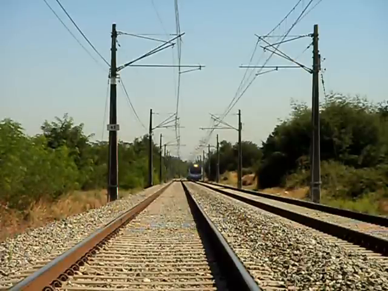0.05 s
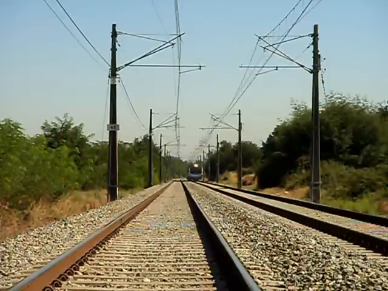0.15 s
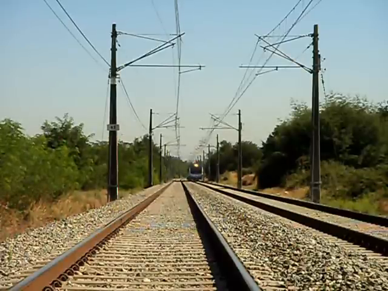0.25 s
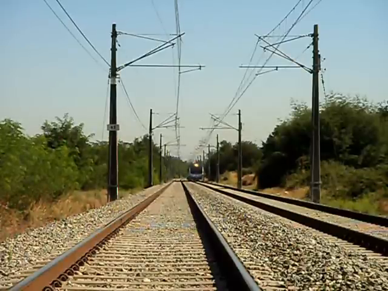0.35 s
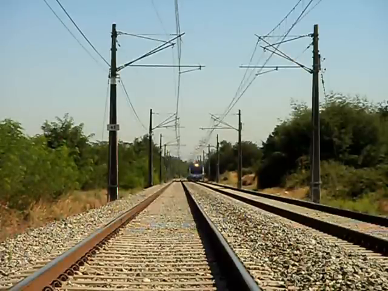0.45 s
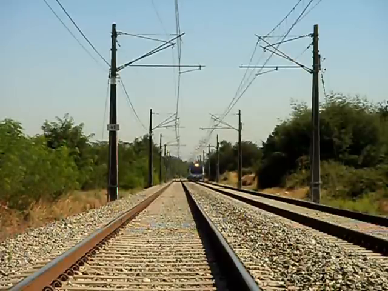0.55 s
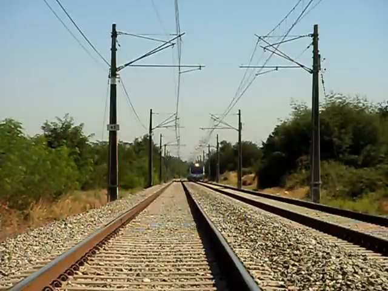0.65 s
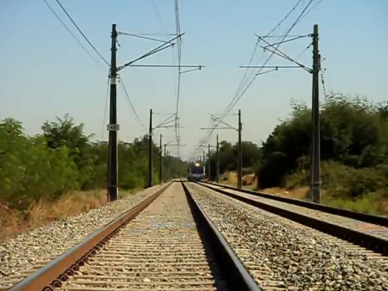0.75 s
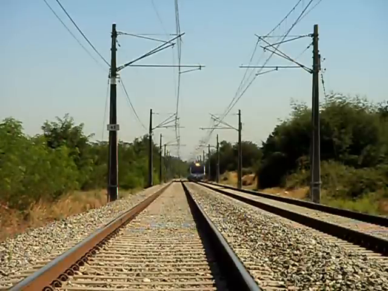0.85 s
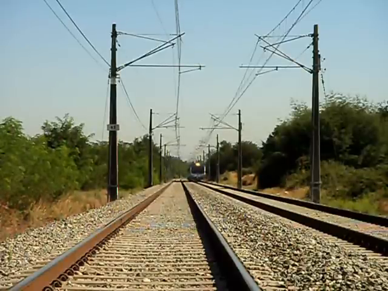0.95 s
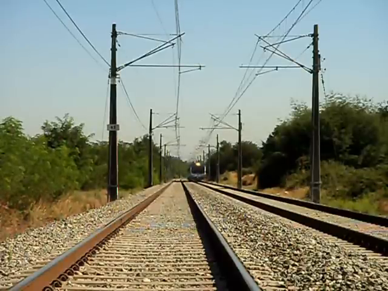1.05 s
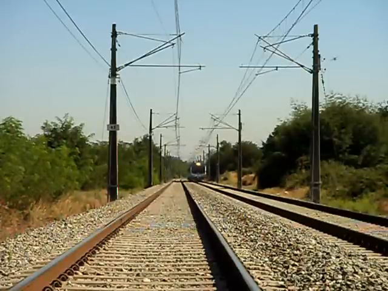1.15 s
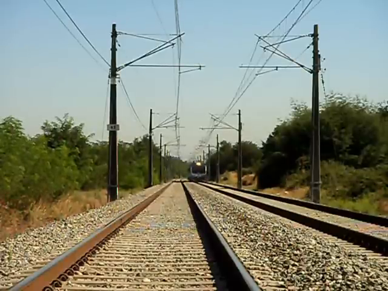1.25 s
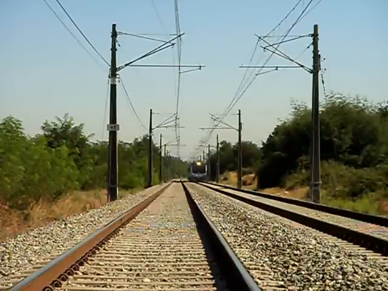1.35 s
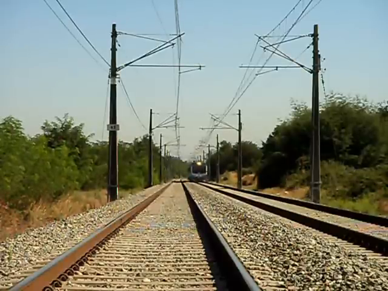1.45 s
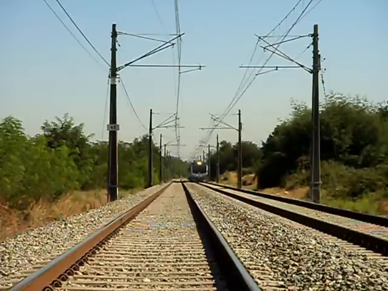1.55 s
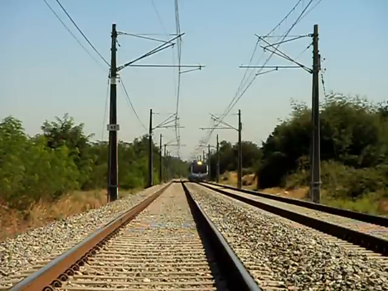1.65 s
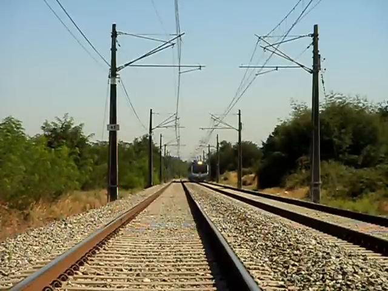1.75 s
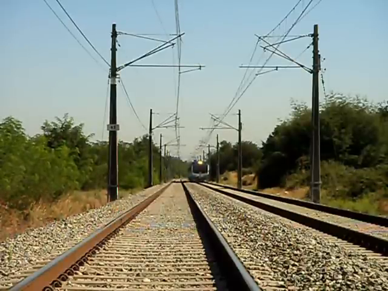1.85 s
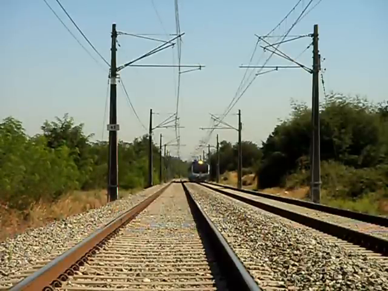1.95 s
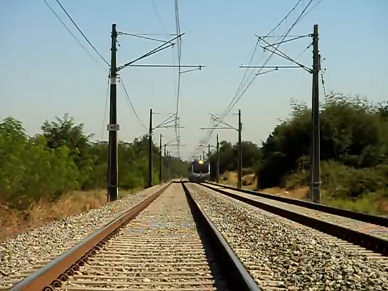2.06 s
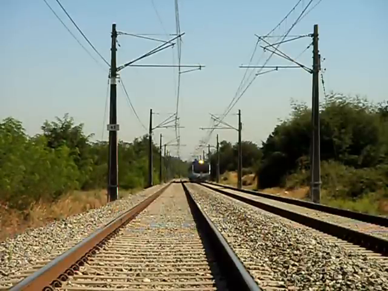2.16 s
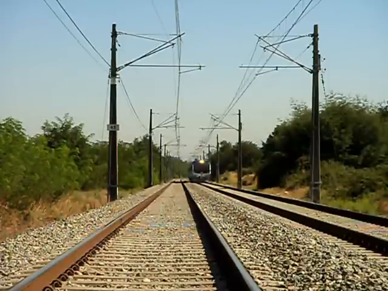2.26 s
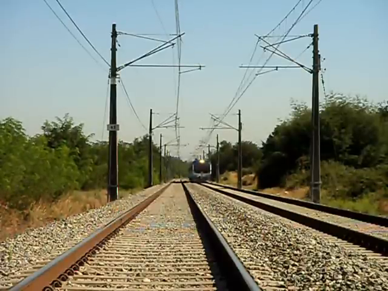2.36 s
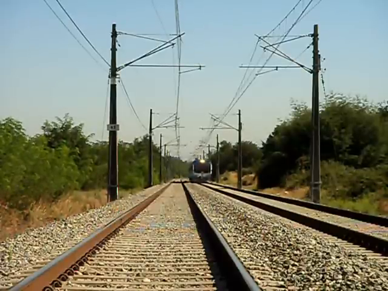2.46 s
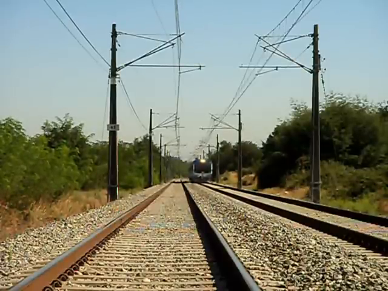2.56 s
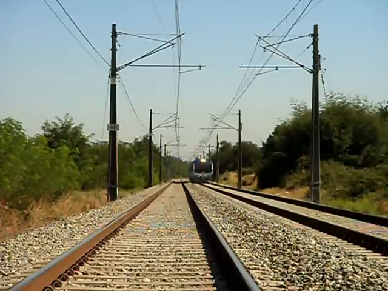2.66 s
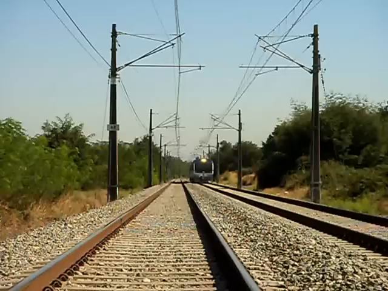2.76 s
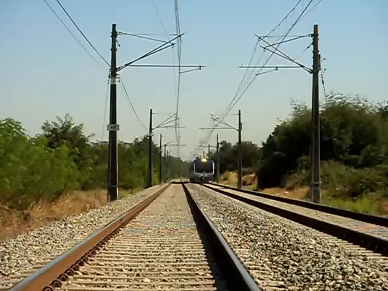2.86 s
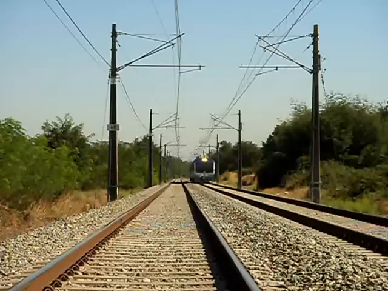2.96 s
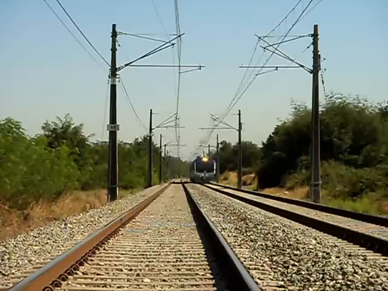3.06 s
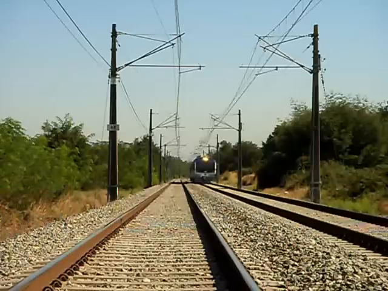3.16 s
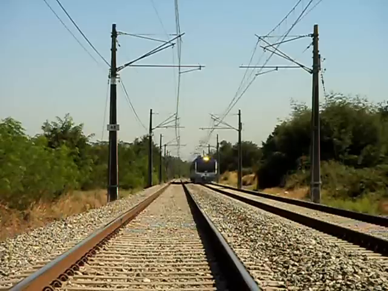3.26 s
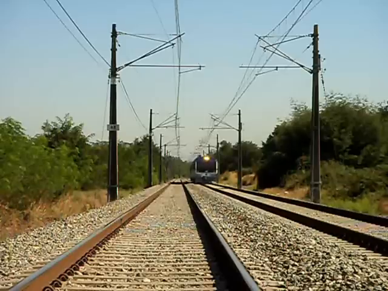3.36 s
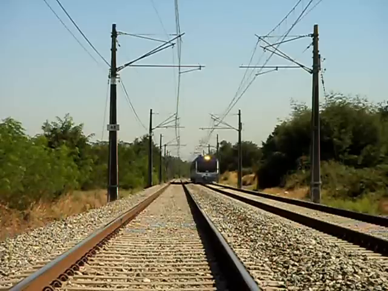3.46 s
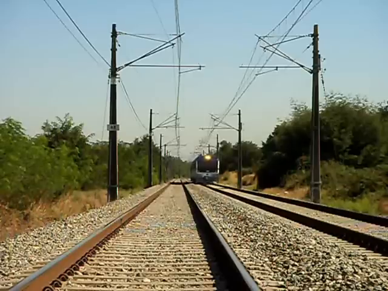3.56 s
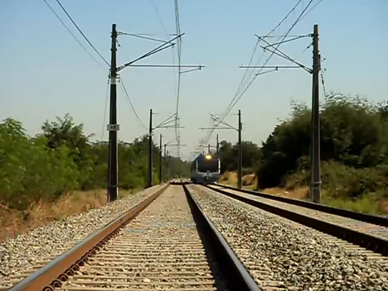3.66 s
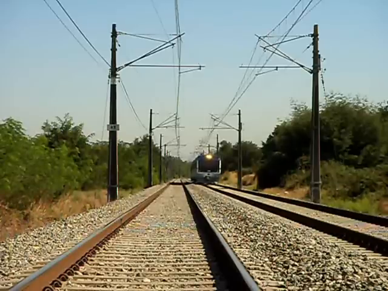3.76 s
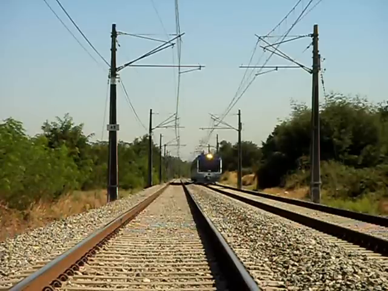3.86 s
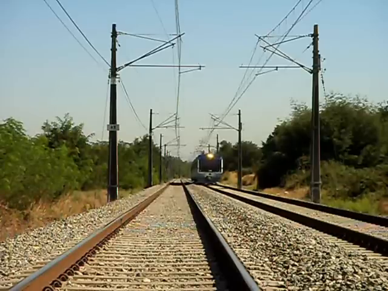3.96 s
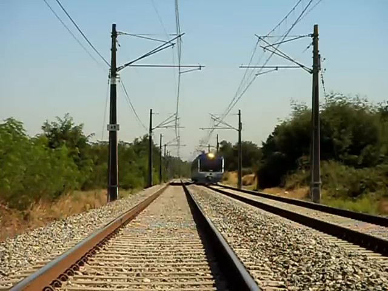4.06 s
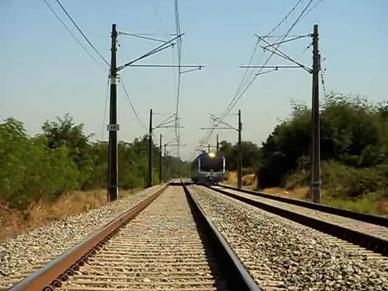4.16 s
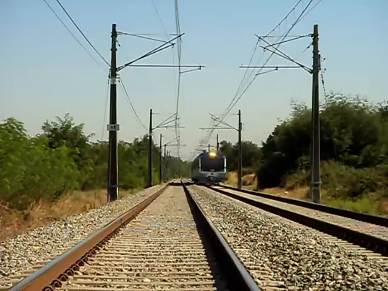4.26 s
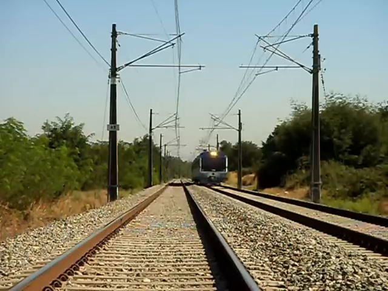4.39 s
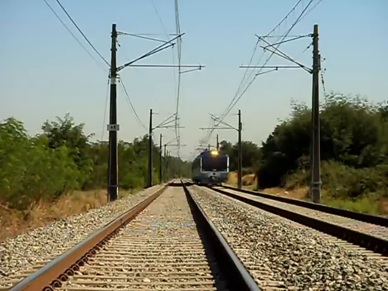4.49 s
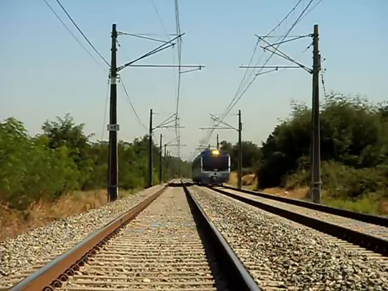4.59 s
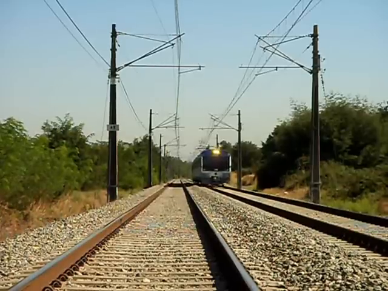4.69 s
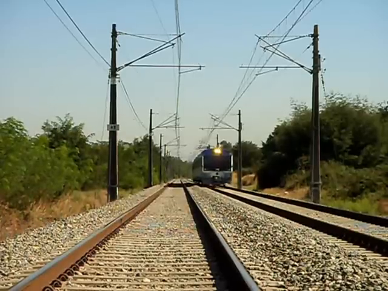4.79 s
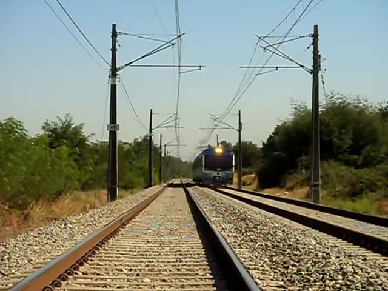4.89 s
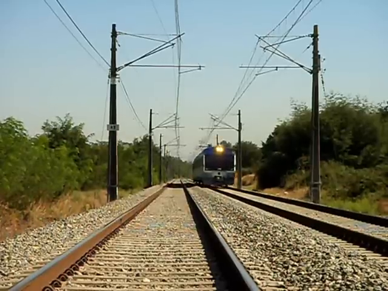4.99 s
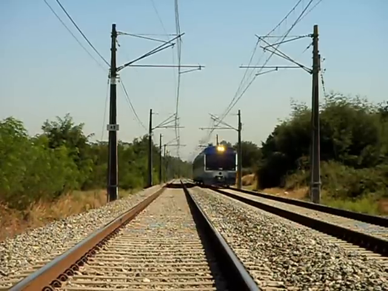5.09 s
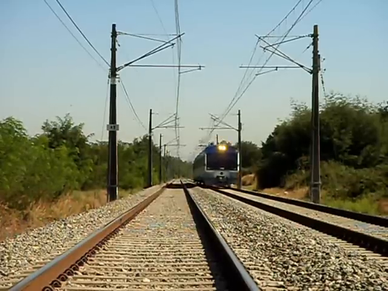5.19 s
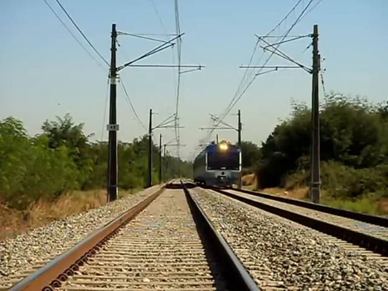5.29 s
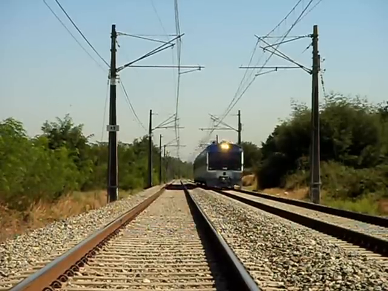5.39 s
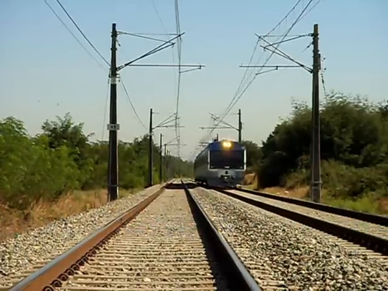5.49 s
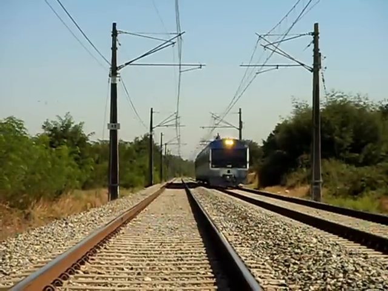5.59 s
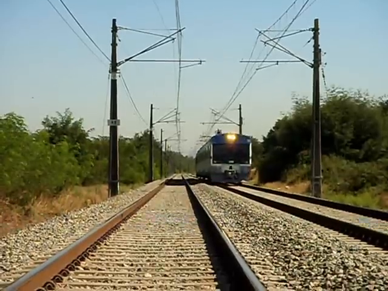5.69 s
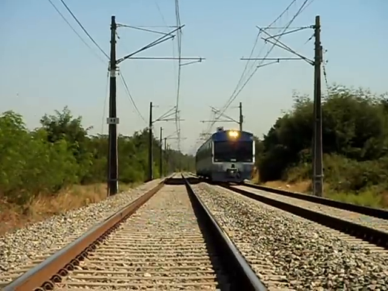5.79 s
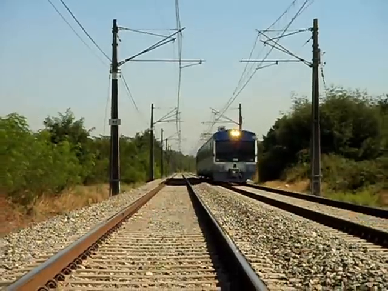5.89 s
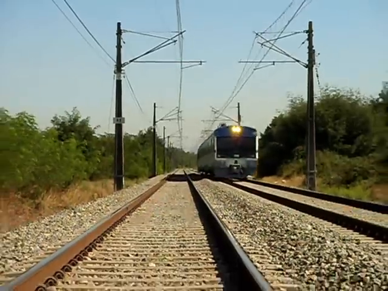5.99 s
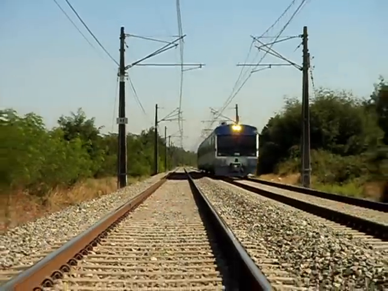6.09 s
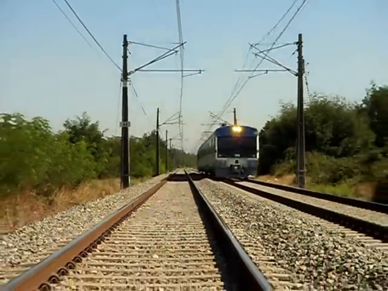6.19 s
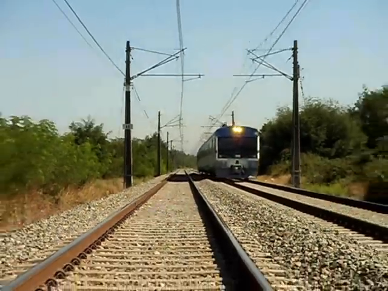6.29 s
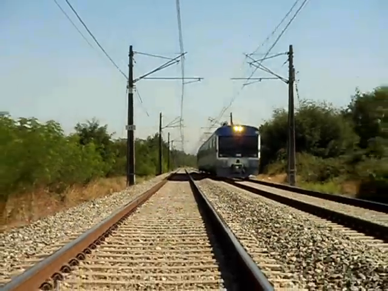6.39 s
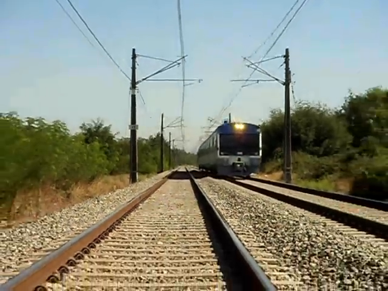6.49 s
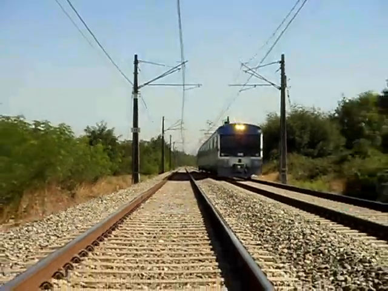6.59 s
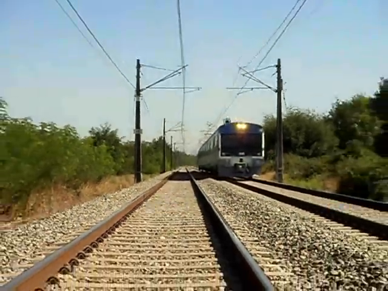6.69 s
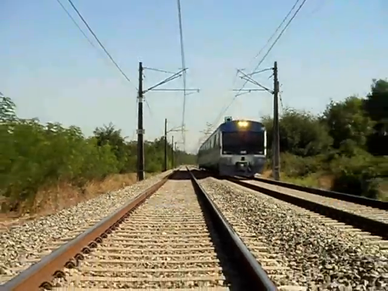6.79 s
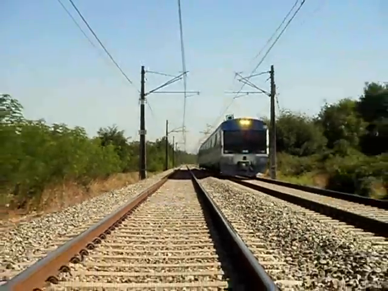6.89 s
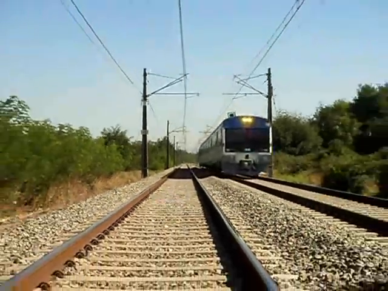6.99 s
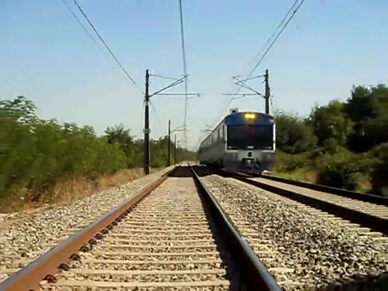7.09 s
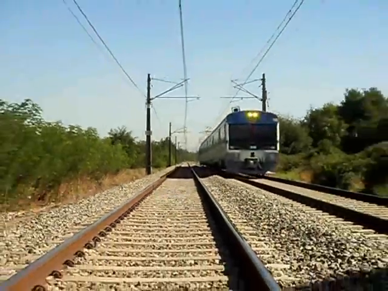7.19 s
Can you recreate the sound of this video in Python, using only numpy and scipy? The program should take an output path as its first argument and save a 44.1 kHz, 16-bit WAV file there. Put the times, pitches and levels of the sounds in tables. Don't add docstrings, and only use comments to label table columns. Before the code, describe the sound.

Rails sing with a wavering metallic ring and sharp falling pings, swelling steadily as an electric train bears down on a trackside microphone.

```python
import sys
import numpy as np
from scipy import signal
from scipy.fft import rfft, irfft, next_fast_len
from scipy.io import wavfile
from scipy.ndimage import map_coordinates

SR = 44100
rng = np.random.default_rng(int(sys.argv[2]) if len(sys.argv) > 2 else 0)


def magnitude_from_level(level_db):
    exponent = np.asarray(level_db, float) / 20
    return 10 ** exponent


def unload_wav(signal):
    wavfile.write(
        sys.argv[1],
        SR,
        np.round(np.clip(np.atleast_2d(signal).T, -1, 1) * 32767).astype(np.int16),
    )


N = 319284

# frequency in Hz, level when near in dB,
# extra loss over the first distance in dB.
SONG = [(490, -27.5, 62), (816, -7, 80), (909.4, 1.5, 37), (1000, 5, 30.5), (1100, 3.5, 23),
        (1200, 3, 10.5), (1301.4, -0.5, 2), (1400, 0.5, -3.5), (1467.7, -1.5, 4.5), (1512, -28.5, 33.5),
        (1808, -26, 4.5), (1990, -19, 10), (2068, -27, 7), (2400, -47.5, 5)]
# level when near in dB, loss over the first distance in dB, share of the swells.
RAIL_SONG, RAIL_HISS = (-38, 18.03, 0.91), (-53, 33.9, 0.15)
GROUND, RIM_RING = (-54.5, 18.7, 0.38), (-57, 23, .3)


def unit(x):
    return x / np.sqrt(np.mean(x ** 2) + 1e-20)


def along(hz, points, db):
    return np.interp(np.log(hz + 1), np.log(points + 1), db)


def wobble(rate_hz):
    knots = rng.standard_normal(int(N * rate_hz / SR) + 4)
    return map_coordinates(knots, [np.arange(N) * rate_hz / SR])


def coloured(points):
    size = next_fast_len(N)
    gain = magnitude_from_level(along(np.fft.rfftfreq(size, 1 / SR), *np.transpose(points)))
    return irfft(rfft(rng.standard_normal(size)) * gain, size)[:N] * np.sqrt(SR / 2)


def add(track, s, sound):
    part = track[max(round(s * SR), 0):][:len(sound)]
    part += sound[:len(part)]


def causal(gain):
    cepstrum = irfft(np.log(gain + 1e-4))
    half = len(cepstrum) // 2
    cepstrum[1:half] *= 2
    cepstrum[half + 1:] = 0
    return np.exp(rfft(cepstrum))


def far(s):
    arrives_s, run_s = 7.243, 6.5
    return np.clip((arrives_s - s) / run_s, 0, None)


def level(law, s):
    # time in seconds, swell in dB.
    swell = [(0, 0), (.54, 2.5), (.85, -0.5), (1.6, .5), (2.1, .3), (3, 0.8), (3.8, 0.5), (4.3, -.6),
             (5, -1.3), (5.3, 2), (5.7, -0.1), (6.3, 1.9), (6.55, 1.2), (6.81, -3), (7.1, 1.5),
             (7.24, -0.3)]
    near_db, loss_db, share = law
    return near_db - loss_db * far(s) + share * np.interp(s, *np.transpose(swell))


def path(table, hz, s):
    points, near_db, loss_db = np.transpose(table)
    near = along(hz, points, near_db)[:, None]
    loss = along(hz, points, loss_db)[:, None]
    return magnitude_from_level(near - loss * far(s))


def carried(table, width_hz, x):
    hz, s, z = signal.stft(x, SR, nperseg=2048)
    passed = signal.istft(z * path(table, hz, s), SR, nperseg=2048)[1][:N]
    return passed * np.sqrt(SR / 2 / width_hz)


def rolling(s):
    # frequency in Hz, level when near in dB, extra first-distance loss
    # in dB.
    high_bands = [(6000, -15.5, 16), (6920, -11.5, 23), (7330, -0.5, 14), (8050, 0.5, -3.5), (8220, -2, -8),
                  (8660, -9, 9), (9200, -6.5, 6), (9800, -9.5, 10),
                  (10350, -12, 6), (10650, -8, -7), (11500, -7, -5), (11800, -11, 14), (12100, -13, 16),
           (12700, -10, 16), (13600, -10, 14), (13880, -4, -6), (14300, -3, 5), (14600, -6, 16),
           (15000, -14, 18), (15700, -14, 14)]
    # frequency in Hz, level when near in dB, extra first-distance loss in dB.
    air_path = [(150, -2.5, 5), (230, -5, 11), (335, 7, 7), (455, 13, 16.5), (574, 6, 35), (740, 14, 39),
                (1530, 10.5, 3), (2180, 6.5, 2), (3000, 4.5, 1.5), (3160, 0.5, 2), (6500, -5.5, 8),
                (16000, -16, 2)]
    lumps = 0.77 * wobble(13) + 0.6 * wobble(37)

    def rough(share, own_db):
        swing_db = share * lumps + own_db * wobble(75)
        return unit(magnitude_from_level(swing_db) * rng.standard_normal(N))

    song = magnitude_from_level(level(RAIL_SONG, s) + 1.5) * carried(SONG, 215, rough(0.84, own_db=1.5))
    crackle = magnitude_from_level(1.17 * wobble(260)) * rough(0.28, own_db=0.8)
    hiss = magnitude_from_level(level(RAIL_HISS, s)) * carried(high_bands, 760, crackle)
    first_db, aside = -66.5, 0.095
    roar_db = first_db - 20 * np.log10(far(s) + aside)
    roar = magnitude_from_level(roar_db - 1.0) * carried(air_path, 4570, rough(0.53, own_db=0.9))
    return song + hiss + roar


def rim_ring(s):
    # frequency in Hz, level in dB.
    rim = [(1820, -44), (1850, -16), (1862, -11), (1878, -7.5), (1920, -36)]
    # time in seconds, extra level in dB.
    spells = [
        (0, -3),
        (1.5, -4),
        (1.65, 1),
        (3.05, 4),
        (3.35, -5),
        (3.55, 1),
        (4.6, 1.5),
        (5.1, -1),
        (7.24, 0),
    ]
    ring = unit(coloured([(1600, -90)] + rim + [(2200, -90)]))
    extra_db = np.interp(s, *np.transpose(spells)) + 1.5 * wobble(7)
    return magnitude_from_level(level(RIM_RING, s) + extra_db) * ring


def ground_rumble(s):
    # frequency in Hz, level in dB.
    rumble = [(15, -28), (35, -7.5), (55, -1.5), (78, 2), (105, -1.5), (135, -13.5), (170, -33), (300, -46)]
    return magnitude_from_level(level(GROUND, s) + 2.0 + 0.93 * wobble(4.04)) * unit(coloured(rumble))


def still_air():
    # frequency in Hz, level in dB per Hz.
    air = [(20, -100), (200, -99.5), (400, -96), (1000, -93.5), (2000, -100), (5000, -104), (10000, -112),
           (16000, -113)]
    return coloured(air)


def contacts():
    # time in seconds, peak in dB, strongest frequency in Hz.
    welds = [
        (0.4, -26, 1370),
        (.7213, -35, 1430),
        (1.294, -36, 1400),
        (1.7253, -28.5, 1427),
        (2.5325, -20, 1370),
        (3.614, -25.5, 1350),
        (4.784, -22.5, 1480),
        (5.484, -13, 1427),
    ]
    # time in seconds, peak in dB, strongest frequency in Hz.
    flaws = [(.83, -42, 1360), (1.4302, -38, 1390), (2.154, -29.5, 1440), (2.4688, -28, 1344),
             (3.23, -30, 1330), (3.255, -29.5, 1380), (3.3648, -30.5, 1356), (3.823, -28.5, 1380),
             (4.002, -29, 1280), (4.047, -30, 1430), (4.434, -23.5, 1330), (4.946, -27, 1370),
             (5.058, -30, 1390), (5.389, -23, 1200), (5.572, -23, 1420), (5.595, -23, 1330),
             (5.695, -21, 1200), (5.806, -20, 1250), (5.837, -20.5, 1440), (6.022, -18.5, 1100),
             (6.16, -18.5, 1180), (6.324, -15.5, 1410), (6.448, -17.5, 1430), (6.501, -14, 1280),
             (6.568, -15.5, 1160), (6.657, -21, 1180), (6.874, -10.5, 1410), (6.893, -8.5, 1210),
             (7.031, -15, 1270), (7.197, -16, 1190)]
    forerun_s, forerun_db = .0163, -11.5
    forerunners = [(t - forerun_s, db - forerun_db * -1, hz) for t, db, hz in welds]
    pits, over_song_db, scatter_db = 85, 13.5, 1.5
    top_hz, range_hz = 1430, 419
    when, size, pitch = rng.random((pits, 3)).T
    s = (np.arange(pits) + when) / pits * N / SR
    pit_db = level(RAIL_SONG, s) + over_song_db + scatter_db * (2 * size - 1)
    pit_hz = top_hz - range_hz * pitch * np.clip(1.15 - far(s), .1, 1)
    return welds + forerunners + flaws + list(zip(s, pit_db, pit_hz))


def blows():
    out, size, lead = np.zeros(N), 8192, 1024
    hz = np.fft.rfftfreq(size, 1 / SR)
    below = np.clip(1480 - hz, 0, 800) / 400
    hits = contacts()
    for (s, db, top_hz), lags in zip(hits, rng.random((len(hits), 3))):
        delay_s = below ** 1.6 * (.0015 + .006 * far(s))
        spread = np.cumsum(delay_s) * 2 * np.pi * hz[1]
        echoes = 1
        for k, u in enumerate(lags):
            lag_s = .0055 * (k + 1.1 + .4 * u)
            echoes = echoes + magnitude_from_level(-11.0 - 2.9 * k) * np.exp(-2j * np.pi * hz * lag_s)
        width_hz = 300 - 170 * far(s)
        lean = 1 / (1 + ((hz - top_hz) / width_hz) ** 2)
        response = causal(path(SONG, hz, s)[:, 0] * lean)
        ping = irfft(response * echoes * np.exp(-1j * spread))
        ping = np.roll(ping, lead - np.abs(ping).argmax())
        add(out, s + 0.002156 - lead / SR, magnitude_from_level(db - 2.5) * ping / np.abs(ping).max())
    return out


def rattles():
    # start in seconds, level in dB.
    events = [(.4, -58), (1.726, -64), (2.531, -50), (3.617, -64), (4.435, -66), (4.785, -55), (5.436, -56),
              (5.482, -44.5), (5.535, -57), (6.893, -40), (7.196, -37.5)]
    out, size = np.zeros(N), 360
    band = signal.butter(2, [2600, 13000], "band", fs=SR)
    for s, db in events:
        rattle = signal.lfilter(*band, rng.standard_normal(size))
        add(out, s, magnitude_from_level(db) * rattle * np.hanning(size))
    return out


def shell_ticks():
    # start in seconds, peak in dB, lowest and highest frequency in Hz, t60 in seconds.
    ticks = [
        (2.807, -38.5, 400, 900, .004),
        (3.38, -51, 300, 600, .006),
        (5.7022, -14, 50, 20000, .014),
        (5.795, -43, 2200, 4500, .01),
        (5.822, -29.5, 1700, 6500, .012),
        (5.955, -42, 2000, 3800, .01),
    ]
    # frequency in Hz, level in dB.
    shell = [(60, -14), (600, -14), (1000, -5), (1600, 3), (2300, 1), (3500, 0), (5500, 0), (6300, -6),
             (7000, -13), (9000, -4), (10500, -11), (13000, -6), (14500, -18), (17000, -18)]
    # lag in seconds, size as a ratio.
    rebounds = [
        (0, 1),
        (.00112, .45),
    ]
    out, size = np.zeros(N), 2048
    t, hz = np.arange(size) / SR, np.fft.rfftfreq(size, 1 / SR)
    shell_gain = magnitude_from_level(along(hz, *np.transpose(shell)))
    for s, db, low_hz, high_hz, t60_s in ticks:
        jolt = .07 * rng.standard_normal(size) * magnitude_from_level(-60 * t / t60_s)
        for lag_s, part in rebounds:
            jolt[round(lag_s * SR)] += part
        band = 1 / (1 + (low_hz / (hz + 1)) ** 4) / (1 + (hz / high_hz) ** 4)
        tick = irfft(rfft(jolt) * causal(shell_gain * band))
        add(out, s, magnitude_from_level(db) * tick / np.abs(tick).max())
    return out


def bird():
    # start in seconds, length in seconds, first and last frequency in Hz, peak in dB.
    whistles = [
        (4.25, .04, 4050, 3950, -68),
        (4.36, .06, 2040, 1940, -59),
        (4.84, .055, 2830, 2500, -61),
        (5.35, .105, 2430, 2800, -57),
        (5.455, .055, 2800, 3280, -56),
        (5.59, .06, 2640, 2690, -58),
    ]
    out, quiver_hz = np.zeros(N), 22 * wobble(90)
    for s, length_s, first_hz, last_hz, db in whistles:
        u = np.linspace(0, 1, round(length_s * SR))
        hz = first_hz + (last_hz - first_hz) * u + quiver_hz[round(s * SR):][:len(u)]
        tone = np.sin(2 * np.pi * np.cumsum(hz) / SR)
        add(out, s, magnitude_from_level(db) * np.sin(np.pi * u) ** .5 * tone)
    return out * magnitude_from_level(1.8 * wobble(70))


def brush(stroke, hz, sharp):
    s, attack_s, hold_s, release_s, db = stroke
    noise = unit(signal.lfilter(*signal.iirpeak(hz, sharp, SR), rng.standard_normal(N)))
    corners_s = np.cumsum([s, attack_s, hold_s, release_s])
    return magnitude_from_level(db) * np.interp(np.arange(N) / SR, corners_s, [0, 1, 1, 0]) * noise


def finger_slip():
    # start, attack, hold and release in seconds, level in dB.
    rub = (5.405, .008, .033, .006, -54.5)
    return brush(rub, 5800, 7)


def air_puff():
    # start, attack, hold and release in seconds, level in dB.
    puff = (6.46, .1, .07, .09, -56)
    return brush(puff, 157, 1.1)


def scene():
    s = np.arange(N) / SR
    train = rolling(s) + rim_ring(s) + ground_rumble(s) + blows() + rattles()
    camera = shell_ticks() + finger_slip() + air_puff()
    return (train + still_air() + camera + bird())[None]


def roll_off(x):
    return signal.sosfilt(signal.butter(12, 16500, fs=SR, output="sos"), x)


def record(dry):
    top_hz = 15740
    kept = irfft(rfft(dry) * (np.fft.rfftfreq(N, 1 / SR) < top_hz), N)
    return roll_off(kept)


dry = scene()
out = record(dry)
unload_wav(out)
```